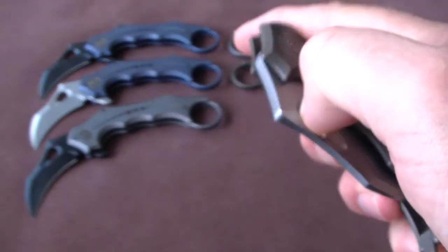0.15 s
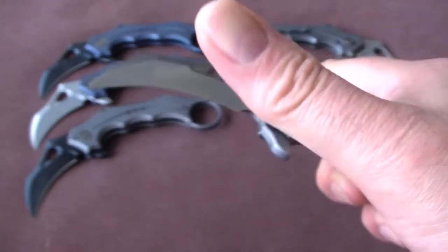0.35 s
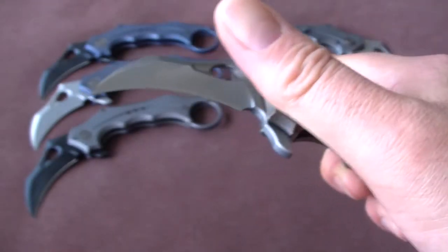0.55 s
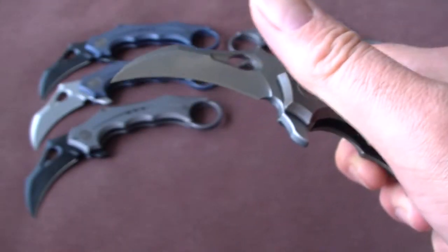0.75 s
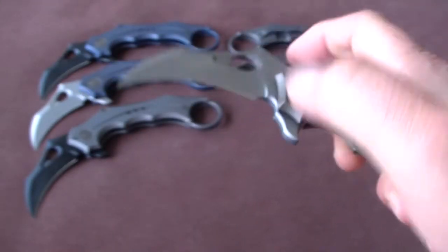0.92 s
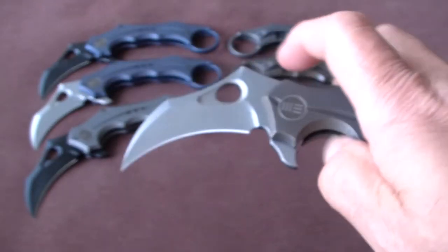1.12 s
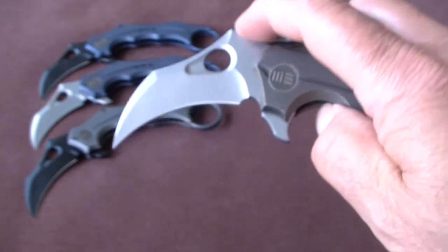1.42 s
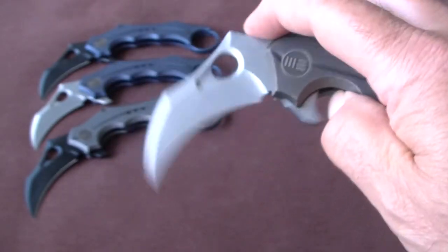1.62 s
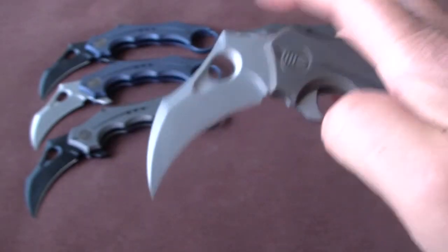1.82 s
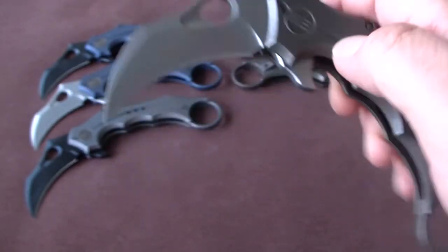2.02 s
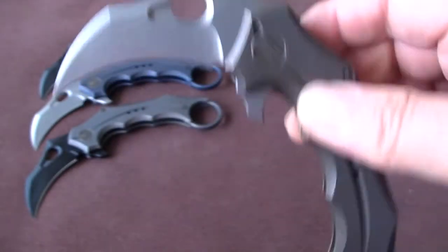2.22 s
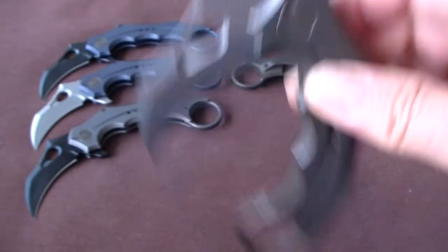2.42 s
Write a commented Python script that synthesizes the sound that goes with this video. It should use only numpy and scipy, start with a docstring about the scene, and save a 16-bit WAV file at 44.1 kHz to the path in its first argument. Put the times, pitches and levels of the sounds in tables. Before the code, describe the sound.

A folding knife blade flicks open with a brief scrape and crisp double click, ringing shortly in a bare room. Then only quiet water-like plinks, tiny ticks, soft rustles, hiss and low hum remain.

```python
"""Folding knife and trickling water

A folding knife snaps open close to a camera in a bare room: the blade leaves its detent, hits the stop
pin, the lock bar drops. Each contact is a noise burst that excites decaying modes of the steel.
Somewhere off, water seems to trickle: plinks, bubbles and ticks are damped sines, blurred by the room.
Soft rustling swells and hiss are shaped noise; mains hum is a few wavering sines.
The camera's gain control ducks after the snap and creeps back."""
import sys
import numpy as np
from scipy import signal
from scipy.fft import rfft, irfft, next_fast_len
from scipy.io import wavfile
from scipy.ndimage import uniform_filter1d, map_coordinates

SR = 44100
rng = np.random.default_rng(int(sys.argv[2]) if len(sys.argv) > 2 else 0)


def materialize(psi):
    """Save the field psi as 16-bit PCM at rate SR to the path in sys.argv[1].

    A 1-D psi becomes a single channel; in a 2-D psi each row is a channel.
    """
    bounded = np.clip(np.atleast_2d(psi).T, -1, 1)
    quanta = np.round(bounded * 32767).astype(np.int16)
    wavfile.write(sys.argv[1], SR, quanta)


def to_linear_factor(level_db):
    """Convert decibel levels (scalar or array-like) to linear amplitude factors."""
    exponent = np.asarray(level_db, float) / 20
    return 10 ** exponent


N = 112454

# Contacts inside the knife: start_s, crack_db, crack_centre_hz, ring_db, time_scale_s
KNIFE_CONTACTS = [(0.197, -32, 9500, -56, 0.0043), (0.208, -32, 11000, -50, .005),
                  (0.2191, -15.5, 9800, -32, 0.004), (.2205, -21, 5500, -24, 0.0055),
                  (.221, -24.5, 1620, -50, 0.0042), (0.236, -28.5, 3660, -40, 0.0044),
                  (0.2442, -10.5, 6140, -31, 0.0013), (0.2444, -21.5, 2190, -34, 0.006),
                  (0.246, -11.5, 6200, -21, 0.0048), (.247, -4.5, 9150, -8.5, 0.0032),
                  (0.2474, -24, 890, -40, 0.0051), (0.252, -11.5, 8900, -39, 0.0026),
                  (0.257, -15, 8450, -24, 0.0062)]
# Modes of the steel: pitch_hz, relative_level_db, t60_s
STEEL_MODES = [(797, -9.5, 0.011), (1710, -7, 0.009), (3040, 7, 0.0095), (3475, 1, 0.014),
               (3596, 12, 0.015), (3726, 5.5, 0.013), (4027, -2.5, 0.019), (4206, -13.5, 0.055),
               (4600, -6, .006), (5430, 1, 0.0098), (5900, 7, 0.0095), (6700, 0, 0.0084),
               (7060, -13, 0.0062), (8400, -1.5, 0.0083), (9370, 3, 0.013)]
# Blade rubbing round its pivot: time_s, level_db
PIVOT_RUB = [(.195, -58), (.205, -48), (.212, -40), (.219, -35), (.226, -36), (.243, -34), (.247, -70)]
# How the knife radiates away from the camera: frequency_hz, gain_db
KNIFE_TO_ROOM = [(500, 7.5), (900, 3), (2000, 2.5), (3600, -5.5), (4500, 2.5), (6000, 1), (9000, 5),
                 (11000, 1), (15000, 1)]
# Jolts of the hand: start_s, level_db, pitch_hz, t60_s
HAND_JOLTS = [(0.223, -28.5, 81, 0.059), (.221, -19, 290, 0.0076), (0.55, -40.5, 147, 0.16),
              (1.505, -30, 560, 0.0069), (2.463, -28, 250, 0.0091), (2.463, -23.5, 630, 0.0051)]
# Loud plinks, before the dry and wet gains: start_s, level_db, pitch_hz
WATER_PLINKS = [(0.086, -62, 1630), (0.137, -58, 1440), (0.497, -39, 1463), (0.548, -45.5, 1380),
                (0.695, -45, 1250), (0.848, -48.5, 1263), (1.006, -45.5, 1510), (1.039, -38.5, 1235),
                (1.185, -36, 944), (1.304, -41, 1460), (1.479, -36.5, 1458), (1.662, -46, 1530),
                (1.759, -40.5, 1292), (1.925, -38, 1490), (1.974, -36, 1305), (2.152, -37, 1264),
                (2.299, -37.5, 1468), (2.324, -43, 1436), (0.0024, -39.5, 1740), (0.0297, -53, 1920),
                (0.162, -44.5, 2480), (0.723, -42, 2350), (0.9056, -48, 1740), (1.0594, -43.5, 2100),
                (1.0974, -39, 2270), (1.3334, -39, 2390), (1.4027, -41, 1760), (1.7401, -43, 2750),
                (2.0884, -40.5, 2820), (2.2129, -38.5, 2175), (2.4794, -38, 2570), (0.7776, -40.5, 3790),
                (0.8144, -44, 3120), (0.9607, -40, 3700), (1.0919, -39.5, 3780), (1.2018, -45, 3900),
                (1.287, -42.5, 3800), (1.5055, -34, 3870), (1.702, -46, 3870), (2.129, -42.5, 3860),
                (2.149, -37.5, 3400), (2.386, -41.5, 3040), (2.462, -42.5, 3850), (2.477, -39.5, 3800),
                (2.5157, -39, 3840)]
# Clear ticks: start_s, level_db, pitch_hz
WATER_TICKS = [(0.1082, -53, 10300), (0.157, -38, 8220), (0.4883, -32, 13900), (0.6439, -33, 10200),
               (0.7546, -38, 8400), (0.811, -35, 9400), (0.838, -29.5, 9840), (1.1967, -49, 9800),
               (1.2504, -32, 8100), (1.505, -34.5, 6000), (1.5727, -25.5, 9700), (1.5994, -40, 7000),
               (1.6822, -32.5, 8470), (1.708, -29.5, 9350), (1.7848, -38, 12200), (1.7988, -28, 12100),
               (1.9096, -32, 6870), (2.1468, -37, 10380), (2.2496, -25, 9650), (2.3563, -29.5, 7400),
               (2.4179, -37, 7650)]
# Soft swells of rustle: start_s, level_db, centre_hz, time_scale_s
RUSTLE_SWELLS = [(.68, -51.5, 6500, .08), (1.339, -50.5, 2180, 0.065), (1.397, -50.5, 2195, 0.073),
                 (1.398, -51.5, 7040, 0.057), (1.652, -51, 3910, .02), (1.735, -50.5, 3180, 0.038),
                 (1.79, -51, 2660, 0.056), (1.843, -54.5, 2650, 0.064), (1.933, -53, 4560, .08),
                 (2.16, -52.5, 3960, 0.058), (2.21, -50.5, 2130, 0.092), (2.38, -57, 2020, 0.059)]
# Decay of the room: frequency_hz, t60_s
ROOM_DECAY = [(200, 0.086), (1500, 0.57), (4000, 0.73), (9000, .45), (15000, 0.25)]
# Left-right likeness of the room's answer: frequency_hz, correlation (1 = alike)
ROOM_LIKENESS = [(300, 0), (1500, 0.8), (3500, 0.74), (7000, 0.3), (14000, 0.083)]
# Hiss spectrum: frequency_hz, relative_density_db
HISS_SPECTRUM = [(15, -45), (25, -11.5), (100, -1), (399, -8), (831, -7), (1280, -11.5), (1510, -9),
                 (2330, -2.5), (9580, -10), (14800, -13.5), (16500, -58)]
# Left-right likeness of the hiss: frequency_hz, correlation (-1 = opposed, 1 = alike)
HISS_LIKENESS = [(60, 0.12), (130, -0.52), (290, -0.83), (640, -0.67), (1410, -0.17), (3100, 0.84),
                 (6820, 0.29), (15000, 0.029)]
# Depth of the hiss's patches: frequency_hz, depth_db
HISS_PATCHES = [(300, 1), (1500, 3), (5000, 3.5), (14000, 4.5)]
# Mains lines: pitch_hz, level_db, waver_db
MAINS_LINES = [(99.6, -66, 4), (203.5, -75, 4), (400.3, -65.5, 0)]
# Gain control, a fast and a slow stage: cut_db_per_db_over, release_db_per_s, attack_s
GAIN_STAGES = [(0.32, 88, 0.022), (0.21, 3.5, 0.026)]


def unit(x):
    """Normalisation: bring a signal to rms 1."""
    return x / np.sqrt(np.mean(x ** 2) + 1e-20)


def along(points, hz):
    """Interpolation: read (Hz, value) points along a logarithmic frequency axis."""
    f, value = np.transpose(points)
    return np.interp(np.log(hz + 1), np.log(f + 1), value)


def filtered(x, response):
    """Linear filtering: multiply the spectrum by a function of frequency."""
    size = next_fast_len(x.shape[-1] + 8192)
    spectrum = rfft(x, size) * response(np.fft.rfftfreq(size, 1 / SR))
    return irfft(spectrum, size)[..., :x.shape[-1]]


def bell(centre_hz, octave_db):
    """Band-pass response: a bell on the octave axis, octave_db down one octave off its centre."""
    return lambda hz: to_linear_factor(-octave_db * np.log2((hz + 1) / centre_hz) ** 2)


def wobble(rate):
    """Slow modulation: a smooth random curve through `rate` knots a second."""
    knots = rng.standard_normal(int(N * rate / SR) + 4)
    return map_coordinates(knots, [np.arange(N) * rate / SR])


def pings(s, db, hz, t60, rise=0, size=2048):
    """Damped resonance: decaying sines with a soft start and optionally rising pitch, summed."""
    s, db, hz, t60 = (np.asarray(column)[:, None] for column in (s, db, hz, t60))
    t = np.arange(size) / SR
    envelope = to_linear_factor(db - 60 * t / t60) * (1 - np.exp(-t * hz))
    wave = envelope * np.sin(2 * np.pi * hz * t * (1 + rise * t / t60))
    at = np.round(s * SR).astype(int) + np.arange(size)
    return np.bincount(at.ravel(), wave.ravel(), N + size)[:N]


def swarm(per_s, hz, spread, cycles, scatter_db, rise, size):
    """Random superposition: pings of log-normal pitch and scattered level, brought to rms 1."""
    when, chance = rng.random((int(per_s * N / SR), 2)).T
    pitch = np.clip(hz * np.exp(spread * rng.standard_normal(len(when))), 1250, 14500)
    db = -scatter_db * np.log(chance + 0.11)
    drops = pings(when * N / SR, db, pitch, cycles / pitch, rise, size=size)
    gush = to_linear_factor(4.5 * wobble(18))  # the flow comes in small gushes
    return unit(gush * drops)


def knife():
    """Impact excitation: each contact cracks and rings the steel's modes; the swing rubs between them."""
    t = np.arange(SR // 2) / SR
    ring_t = np.arange(SR // 8) / SR
    rub_level = to_linear_factor(np.interp(t, *np.transpose(PIVOT_RUB), left=-120, right=-120))
    crack_octave_db = 20
    out = filtered(rng.standard_normal(len(t)) * rub_level, bell(6000, crack_octave_db / 6))
    for s, crack_db, centre_hz, ring_db, length in KNIFE_CONTACTS:
        u = np.clip(t - s, 0, 1) / length
        noise = filtered(rng.standard_normal(len(t)), bell(centre_hz, crack_octave_db))
        crack = u * np.exp(-3 * u) * noise
        out += to_linear_factor(crack_db) * crack / np.abs(crack).max()
        modes = np.zeros(len(ring_t))
        for hz, db, t60 in STEEL_MODES:
            decay = to_linear_factor(db + rng.normal(0, 1.4) - 60 * ring_t / t60)
            modes += decay * np.sin(2 * np.pi * (hz * ring_t + rng.random()))  # random phase
        onset = 1 - np.exp(-(2 * ring_t / length) ** 2)
        out[round(s * SR):][:len(ring_t)] += to_linear_factor(ring_db) * modes * onset
    # the stop pin's own spike
    out += pings(s=[0.24455], db=[5], hz=[13200], t60=[0.001], size=256)[:len(t)]
    low_hz, top_hz = 250, 16600
    banded = filtered(out, lambda hz: (hz < top_hz) / (1 + (low_hz / (hz + 1)) ** 4))
    return np.pad(banded, (0, N - len(t)))


def hand():
    """Low damped resonance: the hand's jolts are dull bumps."""
    return pings(*np.transpose(HAND_JOLTS), size=6000)


def water():
    """Damped drop resonances: plinks, bubbles, ticks and spatter; returns direct sound and room feed."""
    plink_rise = 0.01
    s, db, hz = np.transpose(WATER_PLINKS)
    plink_t60 = 63.3 / hz  # a fixed number of cycles
    tilt_db = 3.5 * np.log2(hz / 1500)  # high plinks are nearer and drier
    near_plinks = pings(s, db + tilt_db, hz, plink_t60, plink_rise, size=3000)
    far_plinks = pings(s, db - tilt_db, hz, plink_t60, plink_rise, size=3000)
    bubbles = swarm(per_s=260, hz=2470, spread=0.427, cycles=32, scatter_db=6.5, rise=plink_rise, size=1024)
    s, db, hz = np.transpose(WATER_TICKS)
    ticks = pings(s, db, hz, 40.6 / hz, size=512)
    spatter = swarm(per_s=250, hz=10400, spread=0.17, cycles=4.5, scatter_db=-1.5, rise=0, size=256)
    direct = to_linear_factor(0.5) * near_plinks + to_linear_factor(-57) * bubbles + ticks + to_linear_factor(-55) * spatter
    room_feed = to_linear_factor(2.5) * far_plinks + to_linear_factor(-61) * bubbles + to_linear_factor(2) * ticks
    return direct, room_feed


def rustle():
    """Enveloped band noise: grainy swells that rise quickly and fade."""
    t = np.arange(N) / SR
    out = np.zeros(N)
    for s, db, centre_hz, length in RUSTLE_SWELLS:
        u = np.clip(t - s, 0, None) / length
        band = filtered(rng.standard_normal(N), bell(centre_hz, octave_db=63))
        out += to_linear_factor(db) * unit(band) * 4 * u * np.exp(1 - 4 * u)
    grain = to_linear_factor(3.5 * wobble(150))
    return out * grain


def room(x):
    """Diffuse reverberation: the answer builds up, then dies at each frequency's own speed."""
    delay_s, rise_s = 0.006, 0.0093
    hz, t, z = signal.stft(rng.standard_normal((2, SR)), SR, nperseg=256)
    shape = to_linear_factor(-60 * t / along(ROOM_DECAY, hz)[:, None]) * (1 - np.exp(-t / rise_s))
    # half the angle whose cosine is the left-right correlation
    turn = np.arccos(np.clip(along(ROOM_LIKENESS, hz), -1, 1))[:, None] / 2
    mid, side = signal.istft(z * shape * [np.cos(turn), np.sin(turn)], SR, nperseg=256)[1]
    tail = np.array([mid + side, mid - side]) / np.linalg.norm(mid + side)
    delayed = np.pad(x, (round(delay_s * SR), 0))
    return signal.fftconvolve(delayed[None], tail, axes=1)[:, :N]


def hiss():
    """Partly correlated noise: patchy in time and pitch, out of phase in the low middle."""
    z = signal.stft(rng.standard_normal((2, N)), nperseg=512)[2]
    field = uniform_filter1d(rng.standard_normal(z.shape[1:]), 7, 0)
    field = uniform_filter1d(field, 11, 1)
    depth_db = along(HISS_PATCHES, np.fft.rfftfreq(512, 1 / SR))[:, None]
    pair = signal.istft(z * to_linear_factor(depth_db * unit(field)), nperseg=512)[1][:, :N]

    def mid_and_side(hz):
        turn = np.arccos(np.clip(along(HISS_LIKENESS, hz), -0.95, 0.95)) / 2
        return to_linear_factor(along(HISS_SPECTRUM, hz)) * [np.ones_like(hz), np.tan(turn)]

    mid, side = filtered(pair, mid_and_side)
    return to_linear_factor(-49) / np.std(mid) * np.array([mid + side, mid - side])


def hum():
    """Mains harmonics: steady-pitched sines, some wavering in level."""
    t = np.arange(N) / SR
    out = np.zeros(N)
    for hz, db, waver_db in MAINS_LINES:
        out += to_linear_factor(db + waver_db * wobble(30.0)) * np.sin(2 * np.pi * hz * t)
    return out


def scene():
    """Superposition: knife and water with their room, over rustle, hiss and hum."""
    knife_pan_db, water_pan_db, knife_lag_s = 0.5, -1.9, 8e-6
    steel = knife()
    direct, room_feed = water()
    side = np.array([[1], [-1]])  # left, right
    # the knife is louder and earlier on the left
    near = filtered(steel * to_linear_factor(knife_pan_db * side), lambda hz: np.exp(1j * np.pi * hz * knife_lag_s * side))
    knife_answer = to_linear_factor(-4.5) * room(filtered(steel, lambda hz: to_linear_factor(along(KNIFE_TO_ROOM, hz))))
    water_pan = to_linear_factor(water_pan_db * side)
    rest = direct * water_pan + room(room_feed) + rustle() * water_pan + hiss() + knife_answer
    return near + hand() + hum() + filtered(rest, lambda hz: hz < 15900)


def low_pass(x):
    """Removes everything above the highest recorded frequency."""
    return signal.sosfilt(signal.butter(12, 17840, fs=SR, output="sos"), x)


def record(dry):
    """Automatic gain control: cuts after loud peaks and lets go at a steady pace in dB."""
    threshold_db = -25.5
    t = np.arange(N) / SR
    peak_db = 20 * np.log10(np.abs(dry).max(0) + 1e-9)
    over_db = np.clip(peak_db - threshold_db, 0, None)
    cut_db = np.zeros(N)
    for ratio, release, attack in GAIN_STAGES:
        # peak hold that falls by `release` dB a second
        held = np.maximum.accumulate(ratio * over_db + release * t) - release * t
        held = np.clip(held, 0, None)
        keep = np.exp(-1 / (attack * SR))
        cut_db += signal.lfilter([1 - keep], [1, -keep], held)
    return low_pass(dry * to_linear_factor(-cut_db))


dry = scene()
out = record(dry)
materialize(out)
```